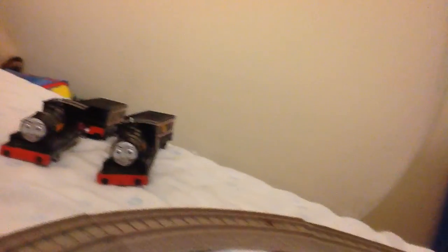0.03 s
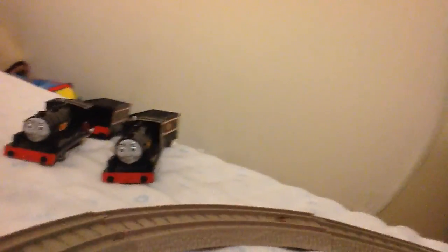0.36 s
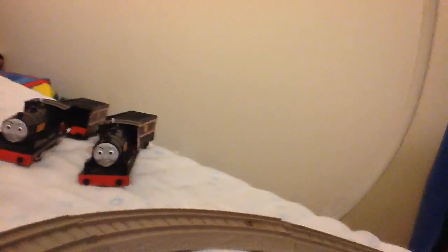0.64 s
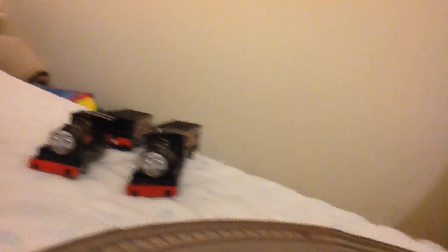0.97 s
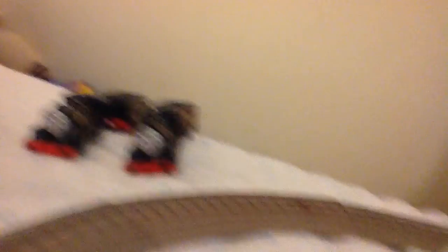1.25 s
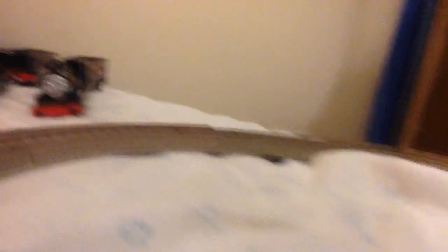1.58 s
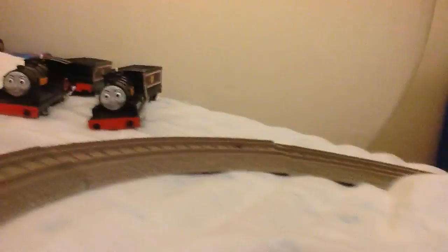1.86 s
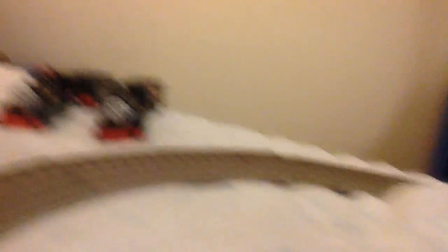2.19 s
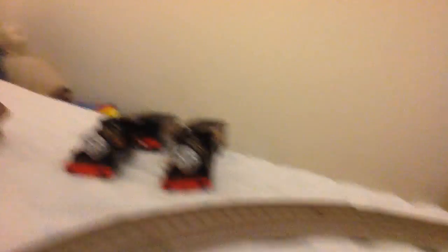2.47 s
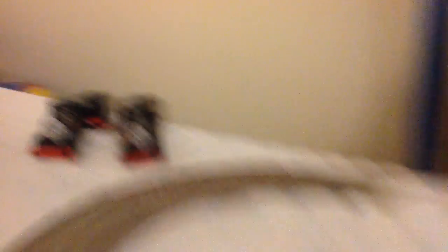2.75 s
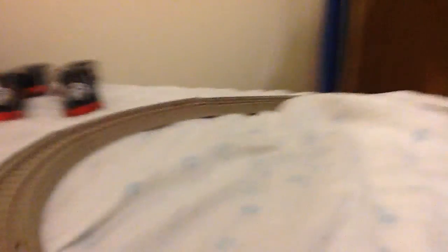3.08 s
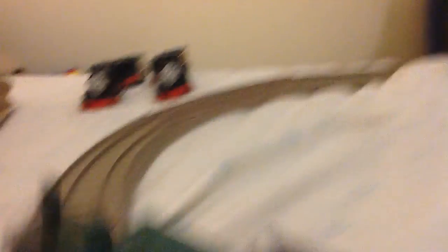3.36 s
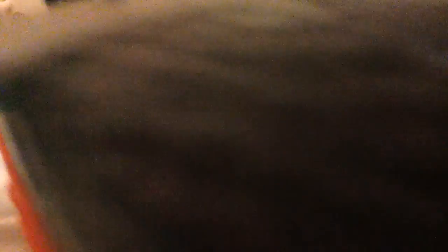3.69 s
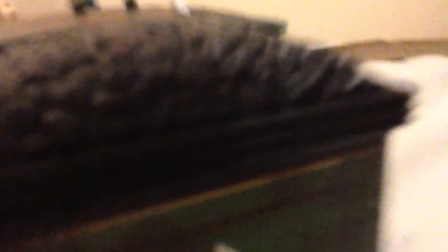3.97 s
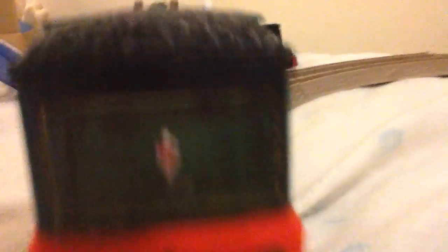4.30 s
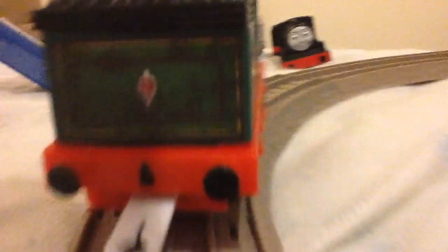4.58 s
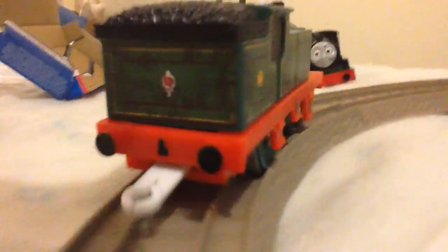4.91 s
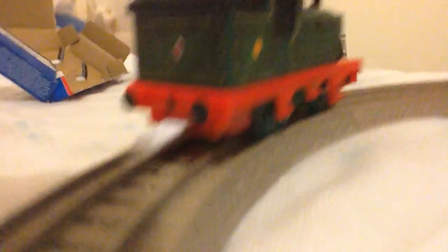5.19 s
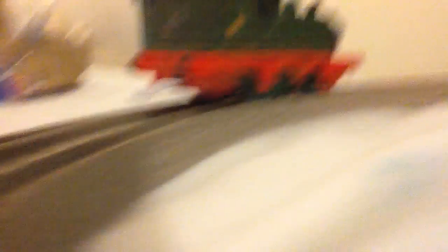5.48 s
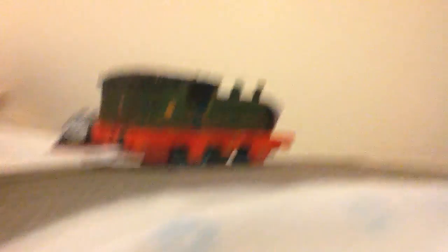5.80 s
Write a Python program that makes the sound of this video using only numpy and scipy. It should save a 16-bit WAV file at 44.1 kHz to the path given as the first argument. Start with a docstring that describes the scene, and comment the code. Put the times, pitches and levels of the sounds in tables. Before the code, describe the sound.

The small motor and plastic gears of a toy train whir steadily, growing louder as it passes, with scattered clicks and handling taps.

```python
"""Fingers tap, slip and click on the recorder's case as a battery toy train circles a plastic track on a bed.
The train draws near: its wheels rumble, plastic parts click, its motor's brushes hiss, its pinion whines, and
loose gear teeth rattle in the hollow body, surging with the load and knocking once per gear turn. At about 3.7
s it passes right by the microphone, flank on, and the gears are at their nearest. It then turns its rear and
draws away, and a few more taps thump on the case."""
import sys
import numpy as np
from scipy import signal
from scipy.fft import rfft, irfft, next_fast_len
from scipy.io import wavfile

SR = 44100
rng = np.random.default_rng(int(sys.argv[2]) if len(sys.argv) > 2 else 0)


def wav_record(signal):
    """Record a signal, one row per channel, as 16-bit PCM in the file named by sys.argv[1]."""
    frames = np.transpose(np.atleast_2d(signal))
    bounded = np.clip(frames, -1, 1)
    # unit amplitude maps onto the largest positive 16-bit level
    quanta = np.round(bounded * 32767).astype(np.int16)
    wavfile.write(sys.argv[1], SR, quanta)


N = 262337

# rotation of the motor: (time [s], speed [turns/s])
MOTOR_SPEED = [(0, 82.5), (0.55, 83), (0.9, 77.6), (1.4, 79.6), (1.9, 86.6), (2.4, 81.8), (2.7, 79.5),
               (3.0, 79.5), (3.26, 81), (3.35, 74.7), (3.8, 73.6), (4.05, 71.4), (4.27, 72.4), (4.33, 76.7),
               (4.48, 76.9), (4.55, 80), (4.75, 80.3), (5.1, 78.7), (5.45, 78), (5.6, 79.6), (5.95, 80.2)]
# gain of the whine and of the resonance that carries it: (time [s], level [dB])
WHINE_GAIN = [(.03, -3), (.1, -6), (.5, -7.5), (.58, -2.5), (.8, 1.5), (1.0, -3.5), (1.3, -1.5), (2.2, 0),
              (2.7, 4.5), (2.85, -0.5), (3.23, -2), (3.35, -3.5)]


def from_db(db):
    """Amplitude grows tenfold for every 20 dB."""
    return 10 ** (np.asarray(db) / 20)


def rms_one(x):
    """Division by the root mean square gives unit power."""
    return x / np.sqrt(np.mean(x ** 2) + 1e-20)


def in_time(rows):
    """Linear interpolation of (time [s], value) gives one value per sample."""
    return np.interp(np.arange(N) / SR, *np.transpose(rows))


def band(x, low_hz, high_hz, order=2):
    """A Butterworth band-pass is maximally flat between its edges."""
    edges = [low_hz, min(high_hz, .45 * SR)]
    return signal.sosfilt(signal.butter(order, edges, "band", fs=SR, output="sos"), x + 1e-18)


def through(x, curve):
    """The folded cepstrum gives a minimum-phase filter that follows (frequency [Hz], gain [dB])."""
    hz, db = np.transpose(curve)
    size = 2 * next_fast_len(N // 2 + 4096)
    bins_hz = np.arange(size // 2 + 1) * SR / size + 1
    gain = from_db(np.interp(np.log(bins_hz), np.log(hz), db))
    cepstrum = irfft(np.log(gain + 1e-6))
    cepstrum[1:size // 2] *= 2
    cepstrum[size // 2 + 1:] = 0
    return irfft(rfft(x, size) * np.exp(rfft(cepstrum)))[:N]


def coloured(x, spectrum):
    """Filtering imposes a spectrum on a white excitation; unit power."""
    return rms_one(through(x, spectrum))


def drift(hz):
    """Interpolated noise fluctuates mostly below the given frequency; unit power."""
    points = rng.standard_normal(4096)
    return rms_one(np.interp(np.arange(N) / SR * hz * 2, np.arange(len(points)), points))


def grains(per_s, spread_db):
    """Shot noise: tiny independent impacts of uneven size; unit power."""
    sizes = from_db(spread_db * np.minimum(rng.standard_normal(N), 2)) * rng.choice([-1, 1], N)
    return rms_one(sizes * (rng.random(N) < per_s / SR))


def strikes(times, db):
    """A brief contact acts as an impulse, placed at the force peak 1.5 ms after the first touch."""
    force = np.zeros(N)
    samples = np.round((np.asarray(times) + .0015) * SR).astype(int)
    force[np.clip(samples, 0, N - 1)] = from_db(db)
    return force


def fade(x, t60):
    """Exponential decay: each impulse falls by 60 dB in t60 seconds."""
    return signal.lfilter([1], [1, -from_db(-60 / (t60 * SR))], x + 1e-18)


def ring(x, hz, t60):
    """A damped oscillator answers a unit impulse with a decaying sine of height 1."""
    radius, angle = from_db(-60 / (t60 * SR)), 2 * np.pi * hz / SR
    return signal.lfilter([0, np.sin(angle)], [1, -2 * radius * np.cos(angle), radius ** 2], x + 1e-18)


def pop(time, db, hz, cycles):
    """Free vibration: a part struck once rings down by 60 dB over the given cycles."""
    return ring(strikes(time, db), hz, cycles / hz)


def resonate(x, hz, width_hz):
    """Two equal resonators in cascade make a peak with steep flanks; unit power."""
    radius = np.exp(-np.pi * width_hz / SR)
    section = [1, 0, -1, 1, -2 * radius * np.cos(2 * np.pi * hz / SR), radius ** 2]
    return rms_one(signal.sosfilt([section, section], x))


def room(x, t60=0.53, wet_db=-13):
    """Reverberation: a bedroom adds a soft tail; a random blend of four stands for shifting echo paths."""
    t = np.arange(SR // 2) / SR
    tails = band(rng.standard_normal((4, len(t))), 200, 7000, order=1)
    tails *= from_db(-60 * t / t60) * (t > .003)
    tails /= np.linalg.norm(tails, axis=1, keepdims=True)
    shares = np.array([drift(3) for _ in tails])
    shares /= np.linalg.norm(shares, axis=0)
    reflections = sum(signal.fftconvolve(x * share, tail)[:N] for share, tail in zip(shares, tails))
    return x + from_db(wet_db) * reflections


def finger_taps(tap_db=-3.5, pop_db=-1, pop_cycles=8):
    """Impact excitation: a tap rings the case's modes and a hollow pop pitched by where it lands."""
    # taps on the case: (time [s], relative level [dB], pop pitch [Hz], contact hardness [dB])
    taps = [(0.006, -14.5, 261, -5), (0.009, -22.5, 514, -12), (0.256, -27.5, 600, 2),
            (5.5955, -20, 614, 1), (5.625, -39, 640, 11), (5.864, -23, 400, 5), (5.8898, -26, 430, 7),
            (5.927, -26, 388, 2)]
    # case modes above the pop: (frequency [Hz], gain [dB], t60 [s])
    case_modes = [(970, -1.5, 0.0087), (1450, -4.5, 0.0072), (1930, -13, 0.002)]
    times, peak_db, pop_hz, hardness_db = np.transpose(taps)
    pops = sum(pop(t, db + tap_db + pop_db, hz, pop_cycles) for t, db, hz in zip(times, peak_db, pop_hz))
    blows = strikes(times, peak_db + tap_db + hardness_db)
    case = sum(from_db(db) * ring(blows, hz, t60) for hz, db, t60 in case_modes)
    return band(pops + case, 185, 12000, order=3)


def finger_slips(rise_db_per_s=906, fall_db_per_s=518):
    """Sliding friction: fingers scratch across the case in brief bursts of grainy noise."""
    # strongest moment of each slip: (time [s], level [dB])
    slips = [(.01, -25), (.055, -31.5), (0.259, -34.5), (.267, -38), (.29, -34), (.303, -36.5)]
    # spectrum of the rubbing: (frequency [Hz], relative density [dB])
    rub_spectrum = [(40, -62), (90, -16), (160, -7), (250, -6), (450, -10.5), (800, -14), (1200, -19),
                    (1800, 1), (3200, -7.5), (4800, -6), (8000, -10.5), (12000, -16.5), (15500, -15)]
    now = np.arange(N) / SR
    envelopes_db = [db - np.maximum(rise_db_per_s * (t - now), fall_db_per_s * (now - t)) for t, db in slips]
    friction = grains(per_s=3700, spread_db=3.0) + .5 * rng.standard_normal(N)
    return from_db(np.max(envelopes_db, axis=0)) * coloured(friction, rub_spectrum)


def brushes(level_db=-55.0, spark_db=2.7):
    """Amplitude-modulated noise: the motor's brushes hiss, a little more strongly once a turn."""
    # spectrum of the hiss: (frequency [Hz], relative density [dB])
    hiss_spectrum = [(2000, -22), (4000, 9), (5600, -6), (6350, 2.5), (7200, -3.5), (8600, -2), (9250, -7),
                     (9900, -1), (12000, -7), (15500, -11)]
    turns = np.cumsum(in_time(MOTOR_SPEED)) / SR
    sparking_db = spark_db * np.cos(2 * np.pi * turns)
    return from_db(level_db + sparking_db) * coloured(rng.standard_normal(N), hiss_spectrum)


def rolling(rumble_db=4.0, bump_db=-5, bump_cycles=10):
    """Roughness excitation: wheels rumble on the track's grain and drop at joints, damped by bedding."""
    # strength of the rumble: (time [s], relative level [dB])
    rumble_level = [(0.0, -65), (0.35, -60.5), (0.62, -64.5), (1.36, -63.5), (1.68, -62), (1.78, -60),
                    (2.05, -59.5), (3.3, -56), (4.9, -62), (5.87, -59), (5.95, -54)]
    # spectrum of the rumble: (frequency [Hz], relative density [dB])
    rumble_spectrum = [(30, -67), (55, -23), (90, -11.5), (140, -3), (200, 5), (280, 5), (450, 0.5),
                       (800, -2), (1200, -2), (2000, -20.5)]
    # drops at the track joints: (time [s], relative level [dB], pitch [Hz])
    joint_bumps = [(1.343, -36, 193), (1.749, -32, 306), (1.762, -37, 190), (1.787, -35, 237),
                   (1.844, -34.5, 262), (2.855, -31, 207), (2.92, -35, 207), (2.924, -39, 620),
                   (2.955, -28.5, 398), (3.172, -30, 365), (3.203, -36, 328), (3.237, -38, 303),
                   (3.331, -28, 457), (3.344, -33, 470), (3.373, -35, 385), (3.39, -35, 310),
                   (3.454, -35, 370), (3.48, -29, 574), (3.51, -38, 254), (3.868, -29.5, 169),
                   (4.543, -31, 258), (5.457, -35.5, 261)]
    roughness = grains(per_s=170, spread_db=6.0) + 0.88 * rng.standard_normal(N)
    rumble = from_db(in_time(rumble_level) + rumble_db) * coloured(roughness, rumble_spectrum)
    joints = sum(pop(t, db + bump_db, hz, bump_cycles) for t, db, hz in joint_bumps)
    return rumble + band(joints, 190, 3000)


def clicks(ping_cycles=26, crack_db=-14, edge_db=-9, crack_t60=0.041, edge_t60=0.028, seat_t60=0.002):
    """Impact transients: hard plastic parts give a short ping inside a crack that builds as they seat."""
    # sharp clicks of hard plastic: # (time [s], relative level [dB], ping pitch [Hz], ping gain [dB], relative
    # treble level [dB])
    snaps = [(0.035, -26, 3040, -1, -31), (0.1412, -21, 3030, -9, -58), (0.172, -33, 4100, 1, -49),
             (0.2594, -11, 1930, -17, -55), (0.29, -24, 2200, -22, -49), (0.3013, -24, 3500, -2.5, -49),
             (0.412, -27, 2430, -7, -48), (0.459, -27, 3780, -5, -60), (0.528, -25.5, 1930, -8, -60),
             (1.747, -19.5, 5150, -4, -36), (1.7865, -28, 4130, 3, -60), (1.816, -22, 2100, -9, -44),
             (2.1953, -21.5, 3900, -5, -48), (2.24, -28, 2660, -1, -51), (2.336, -24, 2550, -1, -43),
             (2.7924, -27, 2010, -10, -28.5), (2.9225, -12, 2280, -13, -52), (2.9543, -22, 2030, 0, -57),
             (3.233, -26, 2470, 2, -60), (3.3742, -25, 4800, 5, -50), (3.446, -19, 4000, -3.5, -45),
             (4.267, -18, 2740, -7, -52), (4.3436, -21, 2520, -8, -38), (4.5584, -27, 3750, -5.5, -60),
             (5.383, -28, 2460, 5, -38), (5.477, -29, 2690, -7, -44), (5.5533, -29, 2420, -7, -53),
             (5.6565, -23, 4550, -2, -50), (5.669, -22, 2900, -8, -52), (5.691, -26.5, 2410, -6, -55),
             (5.791, -23.5, 2650, 3.5, -61)]
    # filter for the sharp edge of a click: (frequency [Hz], gain [dB])
    edge_spectrum = [(3000, -31), (5700, 2.5), (7700, 6), (8800, 13), (9500, -3), (10400, 6), (12000, -2),
                     (14200, 6), (15500, -38)]
    times, peak_db, ping_hz, ping_db, treble_db = np.transpose(snaps)
    pings = sum(pop(t, db, hz, ping_cycles) for t, db, hz in zip(times, peak_db + ping_db, ping_hz))
    blows = strikes(times, peak_db + crack_db)
    crack = (fade(blows, crack_t60) - fade(blows, seat_t60)) * rng.standard_normal(N)
    edge = fade(strikes(times, treble_db + edge_db), edge_t60) * rng.standard_normal(N)
    return band(pings + 2 * crack, 1270, 5740) + 2 * through(edge, edge_spectrum)


def nearness(pass_s=3.746, closest_m=0.093, speed_m_per_s=0.24):
    """Spherical spreading: direct sound falls as one over the distance; 1 at the closest point."""
    along_m = speed_m_per_s * (np.arange(N) / SR - pass_s)
    return closest_m / np.hypot(closest_m, along_m)


def by_side(facing, sides):
    """Directivity: a value passes between those for the front (0), flank (1) and rear (2)."""
    return np.interp(facing, [0, 1, 2], sides)


def swells(rows, squareness=3.5):
    """Super-Gaussian bumps add in dB; a squareness above 2 flattens their tops."""
    t = np.arange(0, N, 64) / SR
    total_db = sum(db * np.exp(-np.minimum(np.abs(2 * (t - middle) / length), 10) ** squareness)
                   for middle, length, db in rows)
    return np.interp(np.arange(N) / SR, t, total_db)


def gear_load():
    """Tooth force follows the load, in dB: up as the wheels bind, down as the drive goes slack."""
    # the wheels bind: (middle time [s], duration [s], rise [dB])
    surges = [(.36, 0.046, 0.5), (.6, 0.041, 0), (1.19, 0.075, 2.5), (1.38, 0.039, 6), (1.58, 0.11, 3.5),
              (1.695, 0.042, 4.5), (1.935, 0.08, 0.5), (2.16, 0.058, 2.5), (2.34, 0.086, 0.5),
              (2.44, 0.013, 3.5), (2.8, 0.1, 2.5)]
    # the drive slackens: (middle time [s], duration [s], depth [dB])
    lulls = [(.17, 0.24, 10.5), (.478, 0.13, 11), (.7, 0.1, 4.5), (1.03, 0.016, 5), (1.29, 0.036, 4),
             (1.495, 0.083, 7), (1.655, 0.015, 5), (1.835, 0.11, 9), (2.04, 0.1, 9.5), (2.275, 0.047, 3),
             (2.55, 0.21, 2), (2.98, 0.08, 6), (3.19, 0.12, 4), (4.3, 0.044, 4), (4.5, 0.071, 3),
             (5.45, 0.045, -1), (5.515, 0.063, 6.5), (5.73, 0.096, 10), (5.92, 0.19, 5)]
    return swells(surges) - swells(lulls)


def shell_interference(x, facing):
    """Interference: the shell's two halves cancel or reinforce in narrow bands, by the side heard."""
    # dips, negative for peaks: (frequency [Hz], width [Hz], depth at front [dB], flank [dB], rear [dB])
    dips = [(2300, 160, -6, 8, -2), (3080, 120, -10, 0, 2), (3480, 170, -4, 2, -6), (4200, 86, -7, 5, 5),
            (4430, 190, 5, 2, -2.5), (5470, 450, 4, 1.5, 3), (7270, 270, -4, -2, 13.5)]
    for hz, width, *sides in dips:
        depth = 1 - from_db(-by_side(facing, sides))
        x = x - depth * signal.lfilter(*signal.iirpeak(hz, hz / width, fs=SR), x)
    return x


def shell_rattle(teeth, wobble_db, knock_db, facing, load_db, hiss=0.81, swell_db=0.75, flicker_db=2.0):
    """Forced vibration: tooth blows and chattering loose parts drive the modes of the hollow body."""
    # body modes: (frequency [Hz], width [Hz], relative level at front [dB], flank [dB], rear [dB])
    shell_modes = [(1202, 450, -5.5, -10, -7), (1558, 386, -3, 6, 3.5), (1951, 182, 3.5, -3, -1.5),
                   (2155, 190, -3, 1.5, -11), (2303, 200, 0.5, -9, -8), (2448, 180, 4, -6, 3),
                   (2688, 260, 1.5, -2.5, -2.5), (2860, 184, -8, -4.5, -1), (3238, 350, -11, -5, -6),
                   (3727, 374, -9, -1.5, -2.5), (3996, 255, -4.5, -1.5, -5), (4315, 280, -9.5, -5.5, -9),
                   (4870, 1570, -11.5, -13.5, -12), (6260, 370, -10, -6.5, -6.5),
                   (6560, 310, -5, -18, -8.5), (6600, 5500, -33, -20.5, -20), (7050, 260, -25, -28, -7),
                   (7830, 260, -20, -19, -28), (8540, 390, -14.5, -17, -18), (9190, 380, -29, -14.5, -16),
                   (10120, 400, -23.5, -12, -12.5), (10800, 6000, -28, -23.5, -19.5)]
    # colouring by the load: (frequency [Hz], gain per load [dB/dB])
    load_colour = [(1600, 0.02), (2400, 0.82), (3200, 0.25), (4000, 0.15), (7000, 0.56)]
    # hollow ring near 4 kHz: (time [s], level [dB])
    hollow_ring = [(.6, -2), (1.2, 5), (1.38, -5.5), (1.9, -2), (2.4, 3.5), (2.8, 3), (3.0, -9),
                   (3.35, -1.5)]
    # bright ring near 6 kHz: (time [s], level [dB])
    bright_ring = [(2.2, -8), (2.8, 0), (3.1, 3), (3.35, -2), (4.15, -1), (4.45, 3), (4.75, 1), (5.4, 0)]
    # thin ring near 8.6 kHz: (time [s], level [dB])
    thin_ring = [(1.75, 2), (2.1, -8), (3.3, 1)]
    ring_bands = [(1400, 1700, WHINE_GAIN), (3500, 4200, hollow_ring),
                  (6000, 6800, bright_ring), (8200, 8900, thin_ring)]
    rattle, mid_power = np.zeros(N), np.zeros(N)
    for k, (hz, width, *sides) in enumerate(shell_modes):
        looseness = np.interp(hz, [3000, 6000], [1.0, 0.25])   # the treble is a smoother rasp
        chatter = looseness * grains(per_s=3800, spread_db=6.0)
        force = rms_one((-1) ** k * teeth + chatter + hiss * rng.standard_normal(N))
        knock_share = np.interp(hz, [2000, 6000], [0.12, 0.32])
        pressure = rms_one(from_db(wobble_db + knock_share * knock_db + flicker_db * drift(40)))
        colour_db = by_side(facing, sides) + load_db * np.interp(hz, *np.transpose(load_colour))
        colour_db += sum(in_time(curve) for low_hz, high_hz, curve in ring_bands if low_hz < hz < high_hz)
        gain = np.sqrt(width) * from_db(colour_db + swell_db * drift(4.3))
        rattle += gain * resonate(force * pressure, hz, width)
        mid_power += gain ** 2 * (1800 < hz < 5000)   # the middle modes carry the loudness
    radiated = shell_interference(rattle / np.sqrt(mid_power), facing)
    return band(radiated, 1206, 14200, order=4)   # a small shell radiates little bass


def pinion_whine(mesh, wobble_db, knock_db, facing, load_db, throb=0.98, load_gain=1.26):
    """Periodic forcing: a throbbing tone at the tooth-mesh frequency drives a low mode of the shell."""
    # gain of the mesh tone: (front [dB], flank [dB], rear [dB])
    side_gains = [-14, -0.2, -4.8]
    flutter_db = drift(140) + .3 * drift(28)
    tone = np.sin(2 * np.pi * mesh) * from_db(throb * wobble_db + knock_db + flutter_db)
    level_db = by_side(facing, side_gains) + in_time(WHINE_GAIN) + load_gain * load_db
    return from_db(level_db) * resonate(tone, hz=1590, width_hz=650)


def once_a_turn(turns, at, width):
    """A periodic pulse rises from 0 to 1 at one angle of a wheel."""
    return np.exp(-(np.sin(np.pi * (turns - at)) / (np.pi * width)) ** 2)


def gearbox(pinion_teeth=20, gear_ratio=5 / 18, motor_db=1.5, tooth_spread=0.45, rattle_db=-1.6,
            direct_db=-33.5, reverberant_db=-41, rear_db=1):
    """Gear meshing: teeth collide, harder at the motor's high spot and at the next gear's tight tooth."""
    # side turned to the microphone: (time [s], side [0 front, 1 flank, 2 rear])
    side_heard = [(0, 0.37), (.65, 0.46), (1.1, 0.052), (1.6, 0.36), (2.6, 0.29), (3.15, 0.74),
                  (3.38, 1.005), (4.1, 0.94), (4.5, 1.71), (5.95, 2.13)]
    # knock of the tight tooth, clearest from the flank: (side [0 to 2], rise [dB])
    knock_by_side = [(0, 3.5), (.5, 5), (.9, 10.5), (2, 10)]
    facing, load_db = in_time(side_heard), gear_load()
    turns = np.cumsum(in_time(MOTOR_SPEED)) / SR
    tight_tooth = once_a_turn(turns * gear_ratio, at=.79, width=.105)
    knock_db = tight_tooth * np.interp(facing, *np.transpose(knock_by_side))
    wobble_db = motor_db * np.cos(2 * np.pi * (turns + .12))
    backlash = .12 * drift(130) + .17 * drift(26)   # teeth come early or late: jitter and slow wander
    unevenness = by_side(facing, [1.4, 1.1, .8])   # the mesh grows more even as the train pulls away
    mesh = turns * pinion_teeth + unevenness * backlash
    contacts = np.diff(np.floor(mesh), prepend=np.floor(mesh[0]))
    teeth = rms_one(contacts * (tooth_spread * rng.standard_normal(N) + 0.18))
    rattle = from_db(rattle_db) * shell_rattle(teeth, wobble_db, knock_db, facing, load_db)
    whine = pinion_whine(mesh, wobble_db, knock_db, facing, load_db)
    path_gain = np.hypot(from_db(direct_db) * nearness(), from_db(reverberant_db))   # powers add
    behind_db = rear_db * np.maximum(facing - 1, 0)   # the gears are louder from behind
    return path_gain * from_db(load_db + behind_db) * (rattle + whine)


def scene():
    """Superposition: the train and the plastic clicks with the room's reflections, and the dry taps and slips
    at the microphone."""
    train = gearbox() + brushes() + rolling() + clicks()
    return (room(train) + finger_taps() + finger_slips())[None]


def record(dry, cutoff_hz=15600):
    """Band limiting: an elliptic low-pass cuts the top steeply."""
    return signal.sosfilt(signal.ellip(10, .2, 80, cutoff_hz, fs=SR, output="sos"), dry)


dry = scene()
out = record(dry)
wav_record(out)
```